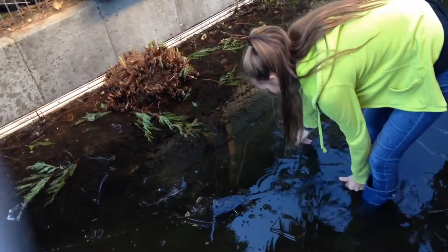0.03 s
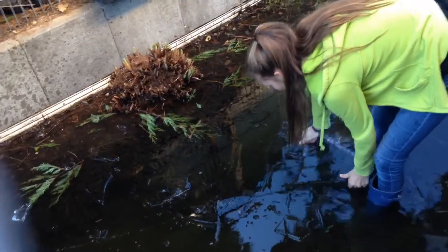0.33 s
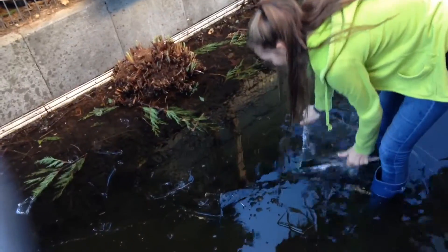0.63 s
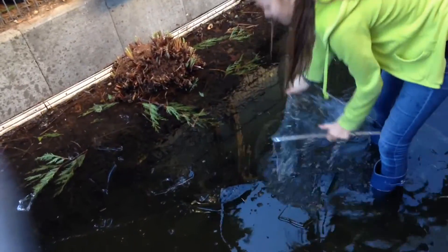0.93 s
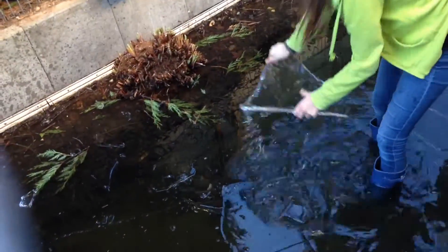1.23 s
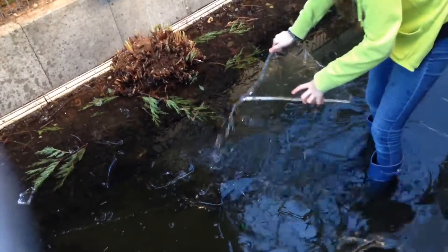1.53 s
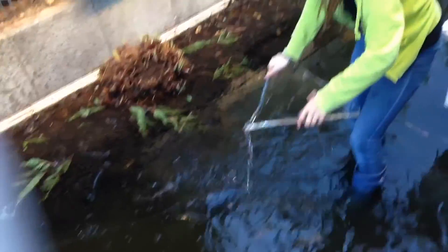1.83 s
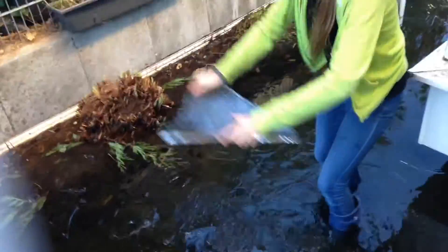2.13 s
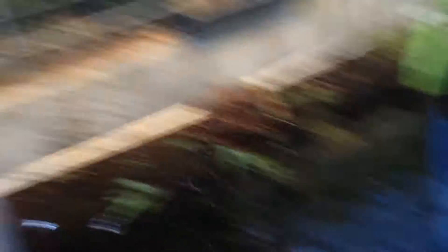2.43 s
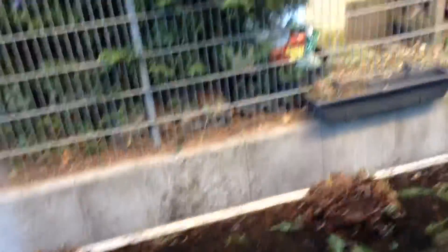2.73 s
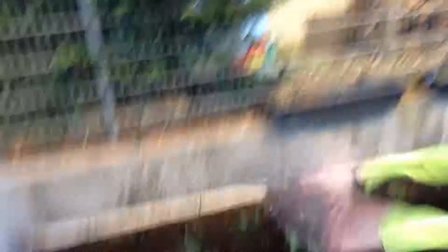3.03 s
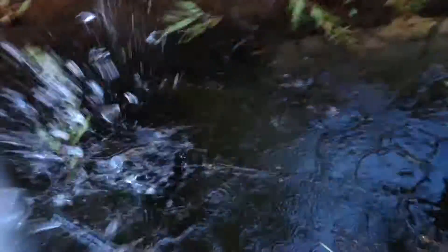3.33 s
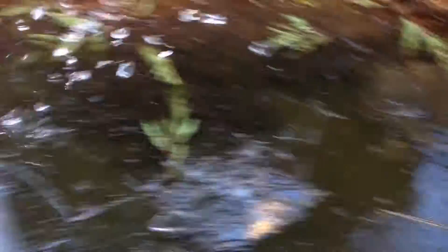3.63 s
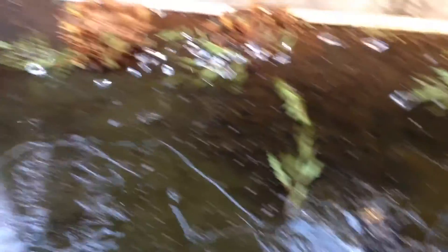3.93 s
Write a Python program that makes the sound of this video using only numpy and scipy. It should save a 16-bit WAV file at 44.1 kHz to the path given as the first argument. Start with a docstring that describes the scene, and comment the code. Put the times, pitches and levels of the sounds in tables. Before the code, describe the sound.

Water drips softly, then thrown ice slaps a pond with a big splash and clinking shards.

```python
"""Ice sheet thrown into a pond

A sheet of ice is lifted from a garden pond: water trickles and drips off it, with a few short scrapes.
Thrown back, it slaps the pond and breaks: water churns, spray rains down, lumps plunge, shards clink.
Water is filtered impact noise plus ringing bubbles; shards are a crack plus damped modes.
Low walls answer briefly over a distant rumble."""
import sys
import numpy as np
from scipy import signal
from scipy.fft import rfft, irfft, next_fast_len
from scipy.io import wavfile
from scipy.ndimage import map_coordinates

SR = 44100
rng = np.random.default_rng(int(sys.argv[2]) if len(sys.argv) > 2 else 0)


def to_wav(sig):
    """Store sig (one row per channel, or 1-D mono) as 16-bit WAV at the path in sys.argv[1].

    Samples outside -1..1 are clipped; the rate is SR.
    """
    pcm = np.clip(np.atleast_2d(sig), -1, 1) * 32767
    pcm = np.round(pcm).astype(np.int16)
    wavfile.write(sys.argv[1], SR, pcm.T)  # frames by channels


N = 176400


def amp(db):
    return 10 ** (np.asarray(db) / 20)


def unit_rms(x):
    return x / np.sqrt(np.mean(x ** 2) + 1e-20)


def clock():
    return np.arange(N) / SR


def along(points, hz):
    """Interpolate (f/Hz, value) points on a log frequency axis."""
    f, v = np.transpose(points)
    return np.interp(np.log(hz + 1), np.log(f + 1), v)


def add(track, start_s, x):
    i = max(0, round(start_s * SR))
    track[i:i + len(x)] += x[:max(0, N - i)]


def butter(x, hz, kind):
    return signal.sosfilt(signal.butter(1, hz, kind, fs=SR, output="sos"), x)


def coloured(x, db_of_hz):
    """Minimum-phase filter with the given dB curve."""
    m = 2 * next_fast_len(len(x) // 2 + 4096)
    gain = amp(db_of_hz(np.fft.rfftfreq(m, 1 / SR)))
    cepstrum = irfft(np.log(gain + 1e-6), m)
    cepstrum[1:m // 2] *= 2
    cepstrum[m // 2 + 1:] = 0
    return irfft(rfft(x, m) * np.exp(rfft(cepstrum)), m)[:len(x)]


def wobble(knots_per_s):
    """Smooth random curve."""
    return map_coordinates(rng.standard_normal(2048), [clock() * knots_per_s], mode="wrap")


def swell(start_s, attack_s, t60_s, hold_s=0):
    """Linear rise, hold, exponential release."""
    t = clock() - start_s
    return np.clip(t / attack_s, 0, 1) * amp(-60 * np.maximum(t - attack_s - hold_s, 0) / t60_s)


def patter(per_s, spread_db, wash):
    """Random impacts of uneven size on a wash of white noise."""
    sizes = amp(spread_db * np.minimum(rng.exponential(size=N), 4)) * rng.choice([-1, 1], N)
    impacts = unit_rms(sizes * (rng.random(N) < per_s / SR))
    return unit_rms(impacts + wash * rng.standard_normal(N))


def droplets(colour, per_s, spread_db, wash):
    """Dense droplet impacts sharing one spectrum."""
    return unit_rms(coloured(patter(per_s, spread_db, wash), lambda hz: along(colour, hz)))


def bubble(hz, t60_s, rise):
    """Damped tone; pitch climbs as the bubble nears the surface."""
    t = np.arange(int(t60_s * SR) + 2) / SR
    phase = 2 * np.pi * hz * (t + rise * t * t / (2 * t60_s))
    return np.sin(phase) * amp(-60 * t / t60_s) * (1 - np.exp(-t * hz))


def bubbles(lo_hz, hi_hz, cycles, spread_db, count):
    """Steady swarm, log-uniform in pitch."""
    out = np.zeros(N)
    for when, height, rank in rng.random((count, 3)):
        hz = lo_hz * (hi_hz / lo_hz) ** height
        gain = amp(-spread_db * np.log(max(rank, .04)))
        add(out, when * N / SR, gain * bubble(hz, cycles / hz, rise=0.097))
    return unit_rms(out)


def contacts(rows, colour, spatter, t60_s, tint_db=4.5):
    """Sharp impulses, each with a short spatter and its own random tint."""
    out, t = np.zeros(N), np.arange(SR // 10) / SR
    for start_s, peak_db in rows:
        kick = spatter * rng.standard_normal(len(t)) * amp(-60 * t / t60_s)
        kick[0] += 1
        tint = tint_db * rng.standard_normal(32)  # half-octave knots
        hit = coloured(kick, lambda hz: along(colour, hz) + map_coordinates(tint, [2 * np.log2(hz + 1)]))
        add(out, start_s, amp(peak_db) * hit / np.abs(hit).max())
    return out


# rumble spectrum: f/Hz, gain/dB
RUMBLE_EQ = [(25, -12), (58, 2.5), (100, -2.5), (150, -13.5), (1100, -21.5), (4000, -35.5), (15500, -47.5)]

def rumble(level_db=-52.5):
    """Distant rumble with a faint hiss."""
    return amp(level_db) * unit_rms(coloured(rng.standard_normal(N), lambda hz: along(RUMBLE_EQ, hz)))


# reverb decay: f/Hz, t60/s
WALL_DECAY = [(1500, 0.27), (12000, 0.14)]

def walls(x, gain_db=-9.5):
    """Short diffuse reflection off low walls, 5 ms late."""
    hz, t, noise = signal.stft(rng.standard_normal(SR // 2), SR, nperseg=256)
    tail = signal.istft(noise * amp(-60 * t / along(WALL_DECAY, hz)[:, None]), SR, nperseg=256)[1]
    return amp(gain_db) * signal.fftconvolve(np.pad(x, (SR // 200, 0)), tail / np.linalg.norm(tail))[:N]


# flow off the sheet: t/s, level/dB
RUNOFF_FLOW = [(0, -54), (.3, -71.5), (.44, -58), (.68, -60.5), (.88, -48), (1.19, -46.5), (1.47, -61.5),
               (1.76, -56.5), (2.17, -56.5), (2.3, -61.5), (3.02, -62)]
# patter spectrum: f/Hz, gain/dB
RUNOFF_EQ = [(300, -21), (900, -6.5), (3000, 3), (14000, -4)]

def runoff():
    """Water leaves the lifted sheet in clumps, pattering and gurgling."""
    flow = amp(np.interp(clock(), *np.transpose(RUNOFF_FLOW)) + 2 * wobble(45))
    drops = droplets(RUNOFF_EQ, per_s=1400, spread_db=2.5, wash=0.33)
    gurgle = bubbles(lo_hz=1640, hi_hz=10400, cycles=37, spread_db=6, count=2400)
    return flow * (amp(-0.5) * drops + amp(-3.5) * gurgle)


# single drips: t/s, f/Hz, level/dB
DRIP_NOTES = [(.8, 1955, -36.5), (1.015, 1490, -34.5), (1.022, 934, -38), (1.029, 1145, -37),
              (1.033, 3090, -27), (1.086, 887, -39), (1.119, 2005, -34), (1.412, 2260, -36.5),
              (1.616, 5330, -35.5), (1.657, 3520, -34), (1.661, 2210, -35), (3.146, 1434, -38)]

def drips(cycles=72):
    """Each drip spits briefly and traps a bubble."""
    out, t = np.zeros(N), np.arange(SR // 10) / SR
    for start_s, hz, db in DRIP_NOTES:
        spit = butter(rng.standard_normal(len(t)), [hz / 2, hz * 2], "band")
        add(out, start_s, amp(db) * bubble(hz, cycles / hz, rise=0.29))
        add(out, start_s, amp(db - 8) * spit * amp(-60 * t / 0.06))
    return out


# thin streams: t/s, f/Hz, level/dB, t60/s
TRICKLE_NOTES = [(1.18, 1198, -53.5, 1.2), (2.09, 2398, -48.5, 0.43)]

def trickles():
    """Thin streams ring unsteadily in the pond."""
    out = np.zeros(N)
    for start_s, hz, db, t60_s in TRICKLE_NOTES:
        envelope = amp(db) * swell(start_s, 0.019, t60_s) * wobble(hz / 10)
        out += envelope * np.sin(2 * np.pi * hz * clock() + wobble(hz / 20))
    return out


# small impacts: t/s, peak/dB
TICK_HITS = [(.531, -21.5), (.8655, -18), (.912, -22), (1.1415, -20), (1.262, -30.5), (1.32, -32.5),
             (2.073, -29), (2.2295, -29.5), (2.504, -24), (2.7435, -33), (3.486, -13.5), (3.495, -10),
             (3.581, -11.5)]
# tick spectrum: f/Hz, gain/dB
TICK_EQ = [(300, -17), (4500, 4), (15000, -6.5)]

def ticks():
    """Sharp contacts of drops and ice."""
    return contacts(TICK_HITS, TICK_EQ, spatter=0.18, t60_s=0.033)


# grit bursts: t/s, attack/s, t60/s, level/dB, centre/Hz, width/oct, treble/dB
SCRAPE_BURSTS = [(-.02, 0.015, 0.2, -39.5, 172, 0.49, -31), (.529, 0.0016, 0.095, -38.5, 800, 0.63, -20),
                 (0.5643, 0.0017, 0.13, -30, 1040, 0.81, -10.5),
                 (1.651, 0.005, 0.067, -34, 3930, 0.37, -6.5), (1.916, 0.0027, 0.34, -43, 5770, 1.1, -8),
                 (1.929, 0.051, 0.16, -46, 242, 1.37, -37), (2.505, 0.0051, 0.099, -32.5, 1840, 0.71, -1),
                 (2.737, 0.004, 0.12, -39, 1470, 0.7, -24), (2.764, 0.018, 0.14, -42, 2060, 0.52, -17),
                 (3.053, 0.026, 1, -47.5, 870, 2.14, -37)]
# shared resonances: f/Hz, gain/dB
SCRAPE_PEAKS = [(1390, 6.5), (1900, 0.5), (2390, 1.5)]

def scrapes(q=31):
    """Grit and spatter, each burst a broad hump plus a treble shelf; all ring the same modes."""
    out = np.zeros(N)
    for start_s, attack_s, t60_s, db, centre_hz, width_oct, treble_db in SCRAPE_BURSTS:
        def curve_db(hz):
            hump = np.exp(-.5 * (np.log2((hz + 1) / centre_hz) / width_oct) ** 2)
            shelf = amp(treble_db) * hz / (hz + centre_hz)
            return 20 * np.log10(hump + shelf + 1e-4)
        grains = patter(per_s=2500, spread_db=5, wash=0.72)[:SR // 2]
        grit = unit_rms(coloured(grains, curve_db))
        out += amp(db) * swell(start_s, attack_s, t60_s) * np.resize(grit, N)
    return out + sum(amp(db) * signal.lfilter(*signal.iirpeak(hz, q, fs=SR), out)
                     for hz, db in SCRAPE_PEAKS)


def treble_peak(x, hz=13560, gain_db=-0.5, q=16):
    """Add a narrow microphone-like peak near 13.6 kHz."""
    return x + amp(gain_db) * signal.lfilter(*signal.iirpeak(hz, q, fs=SR), x)


# falling spray: t/s, level/dB
SPRAY_FLOW = [(3.34, -32.5), (3.52, -32.5), (3.67, -28.5), (3.78, -33), (4, -30.5)]
# spray spectrum: f/Hz, gain/dB
SPRAY_EQ = [(120, -26), (500, -11), (850, -4.5), (1800, -2), (6000, -10), (15500, -13.5)]

def spray(start_s):
    """Spray rains on the pond in clumps; one shower crackles brightly."""
    flow = amp(np.interp(clock(), *np.transpose(SPRAY_FLOW)) + 1.8 * wobble(70))
    onset = np.clip((clock() - start_s) / 0.056, 0, 1)
    rain = droplets(SPRAY_EQ, per_s=1500, spread_db=3, wash=1)
    fizz = bubbles(lo_hz=1380, hi_hz=11100, cycles=13, spread_db=5.5, count=2200)
    crackle = droplets(TICK_EQ, per_s=1600, spread_db=6, wash=0.45)
    shower = amp(-28) * swell(start_s=3.584, attack_s=0.0064, t60_s=0.53)
    return flow * onset * (amp(-1.5) * rain + amp(-5.5) * fizz) + shower * crackle


# falling lumps: t/s, attack/s, t60/s, level/dB
PLUNGE_BURSTS = [(3.669, 0.031, 0.55, -26), (3.833, 0.025, 0.25, -24), (3.941, 0.031, 0.11, -31)]
# plunge spectrum: f/Hz, gain/dB
PLUNGE_EQ = [(30, -30), (70, -3), (160, -5.5), (870, 0), (2500, -4.5), (12000, -18)]

def plunges():
    """Lumps of ice and water plunge in with a gulp of large bubbles."""
    slosh = droplets(PLUNGE_EQ, per_s=1000, spread_db=-0.5, wash=0.45)
    gulp = bubbles(lo_hz=326, hi_hz=1690, cycles=36, spread_db=4.5, count=700)
    envelope = sum(amp(db) * swell(*timing) for *timing, db in PLUNGE_BURSTS)
    return envelope * (slosh + amp(-10) * gulp)


# closing cavities: t/s, f/Hz, level/dB
PLOP_NOTES = [(3.578, 321, -25.5), (3.579, 615, -15.5), (3.864, 273, -25), (3.969, 477, -20)]

def plops(cycles=14.3):
    """Cavities close behind falling lumps, one short low note each."""
    out = np.zeros(N)
    for start_s, hz, db in PLOP_NOTES:
        add(out, start_s, amp(db) * bubble(hz, cycles / hz, rise=0.15))
    return out


# shard collisions: t/s, peak/dB, pitch ratio
SHARD_KNOCKS = [(3.424, -24, 0.36), (3.6794, -3, 1.385), (3.816, -20, 0.49), (3.8449, -11, 1),
                (3.932, -7, .98), (3.939, -2, 1), (3.9596, -12.5, 1.1)]
# ice modes at pitch ratio 1: f/Hz, gain/dB, t60/s
SHARD_MODES = [(1757, -1, 0.013), (2410, -3.5, 0.012), (2864, -3.5, 0.019), (4267, -0.5, 0.027),
               (6220, -10, 0.019)]

def shards():
    """Each knock cracks and rings the ice; smaller, higher shards die sooner."""
    out, t = np.zeros(N), np.arange(SR // 8) / SR
    for start_s, peak_db, pitch in SHARD_KNOCKS:
        ring = np.zeros(len(t))
        for hz, db, t60_s in SHARD_MODES:
            decay = amp(db + rng.normal() - 60 * t * pitch / t60_s)
            ring += decay * np.sin(2 * np.pi * (hz * pitch * t + rng.random()))
        crack = butter(rng.standard_normal(len(t)), [1200, 7000], "band") * amp(-60 * t / 0.013)
        hit = (ring + 1.02 * crack) * (1 - np.exp(-t / 0.00013))
        add(out, start_s, amp(peak_db) * hit / np.abs(hit).max())
    return out


# flat blows of ice on water: t/s, peak/dB
SLAP_HITS = [(3.2465, -6), (3.2528, 1), (3.2588, -6.5), (3.2675, -1.5), (3.701, -12.5), (3.9705, -10)]
# splash spectrum: f/Hz, gain/dB
SPLASH_EQ = [(80, -34), (290, -12.5), (520, -10), (790, -1), (1450, -8.5), (2300, -7), (5500, -15.5),
             (15500, -25)]
# air pockets under the sheet: f/Hz, gain/dB
POCKET_MODES = [(320, -26), (577, -22.5), (738, -30), (822, -22), (985, -23), (1325, -24.5), (2186, -19.5)]

def splash(start_s, attack_s=0.0039, hold_s=0.056):
    """The sheet slaps down, traps ringing air and throws up water; the hiss dies before the churn."""
    def envelope(t60_s):
        return swell(start_s, attack_s, t60_s, hold_s)
    burst = droplets(SPLASH_EQ, per_s=2500, spread_db=1, wash=0.72)
    churn = butter(burst, 2200, "low") * envelope(t60_s=0.25)
    hiss = butter(burst, 2200, "high") * envelope(t60_s=0.098)
    pockets = sum(amp(db) * np.sin(2 * np.pi * (hz * clock() + rng.random()) + 0.44 * wobble(60))
                  for hz, db in POCKET_MODES)
    slaps = contacts(SLAP_HITS, SPLASH_EQ, spatter=0.23, t60_s=0.016)
    return amp(-16.5) * (churn + hiss) + amp(-9) * pockets * envelope(t60_s=0.13) + slaps


def scene():
    impact_s = 3.2445
    lift = treble_peak(runoff() + drips() + trickles() + ticks() + scrapes())
    throw = splash(impact_s) + spray(impact_s) + plunges() + plops() + shards()
    pond = lift + throw
    return (pond + walls(pond) + rumble())[None]


def record(dry):
    """Clip at full scale, then band-limit."""
    top_hz = 15400
    m = next_fast_len(N + SR // 2)
    passband = np.fft.rfftfreq(m, 1 / SR) < top_hz
    return irfft(rfft(np.clip(dry, -1, 1), m) * passband, m)[..., :N]


dry = scene()
out = record(dry)
to_wav(out)
```